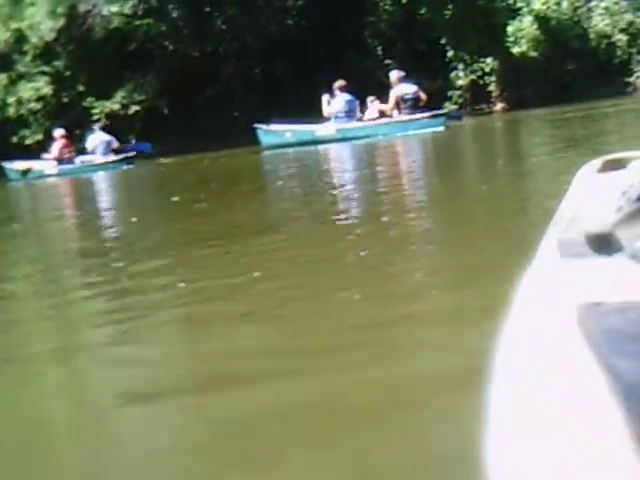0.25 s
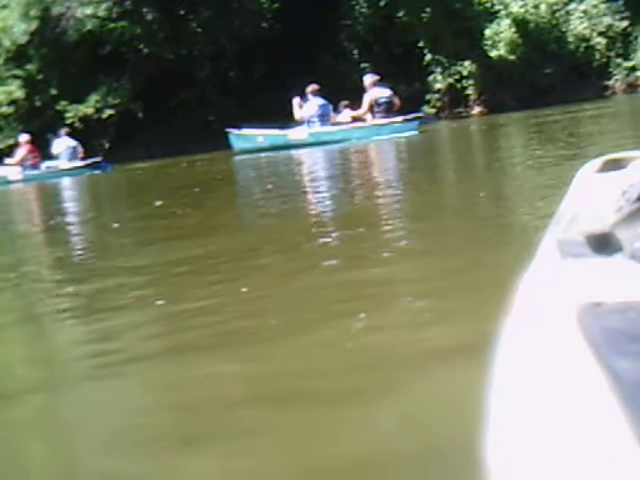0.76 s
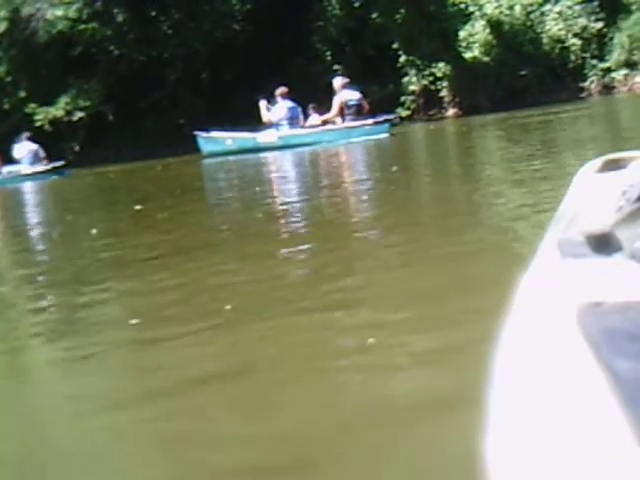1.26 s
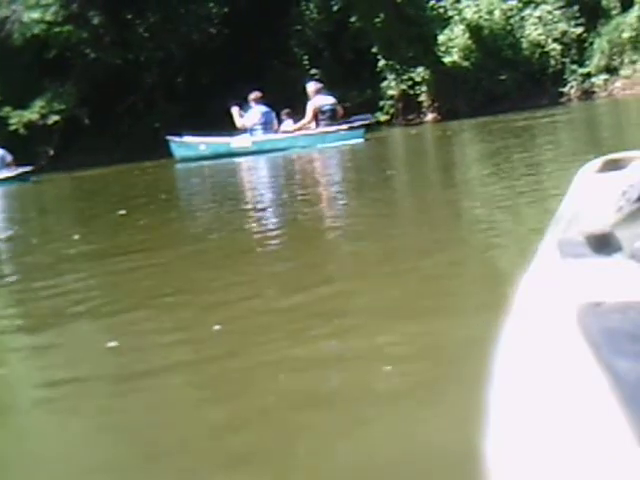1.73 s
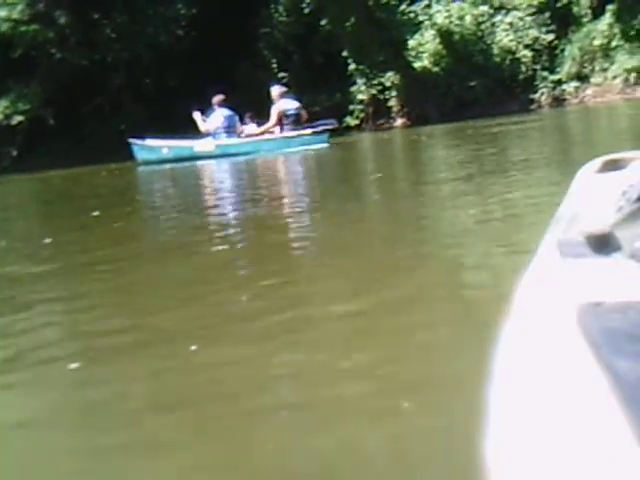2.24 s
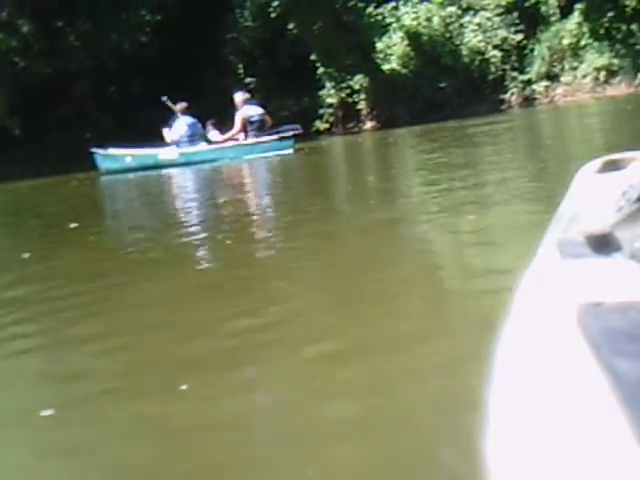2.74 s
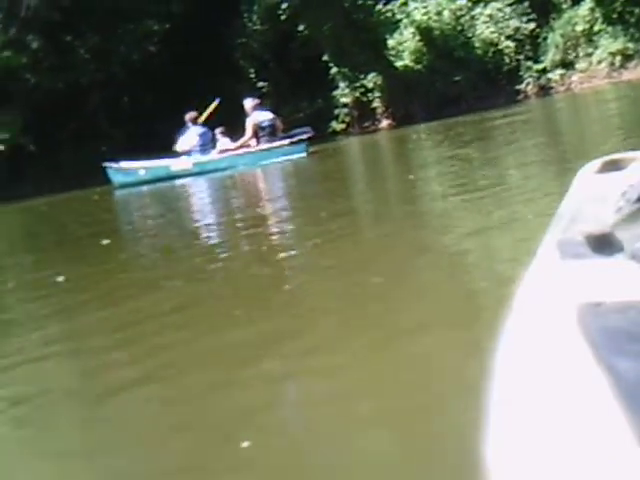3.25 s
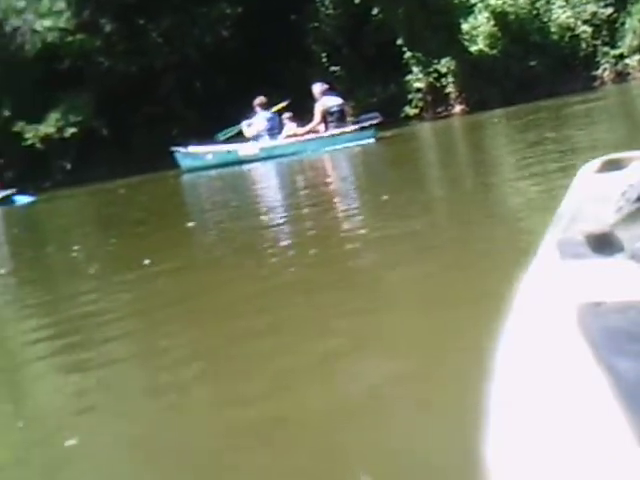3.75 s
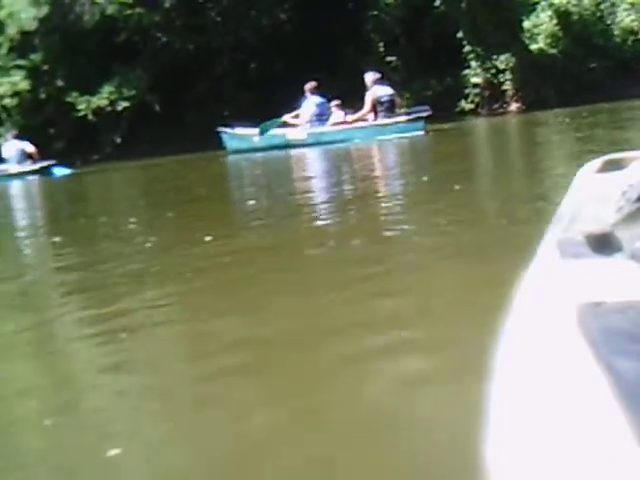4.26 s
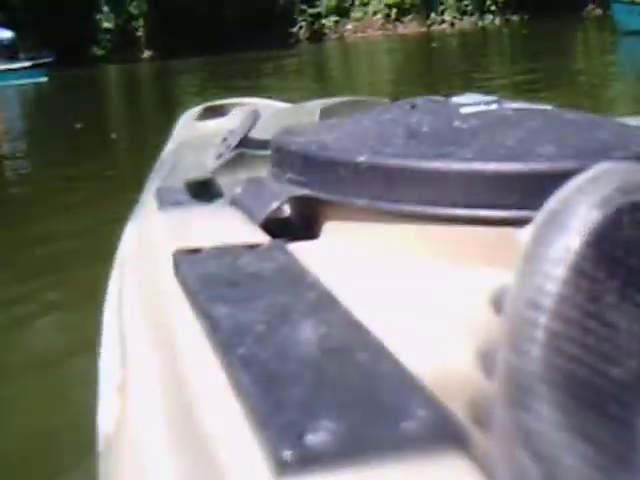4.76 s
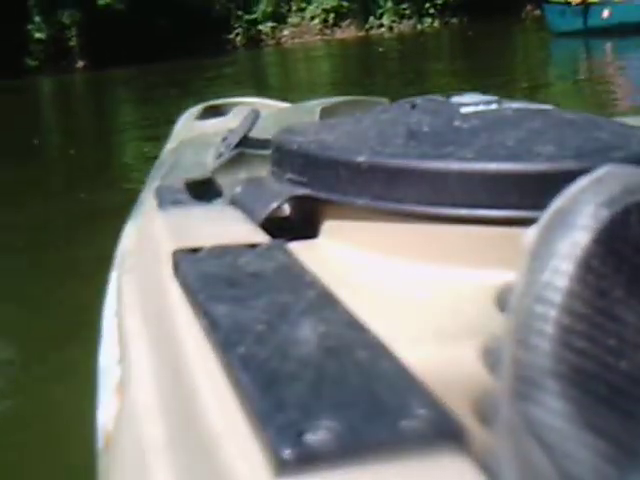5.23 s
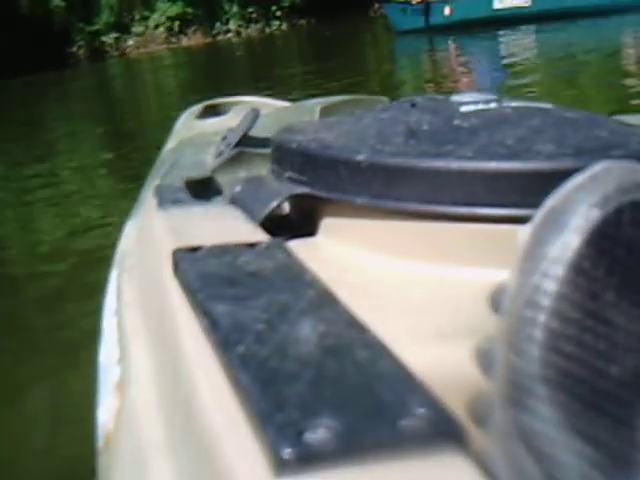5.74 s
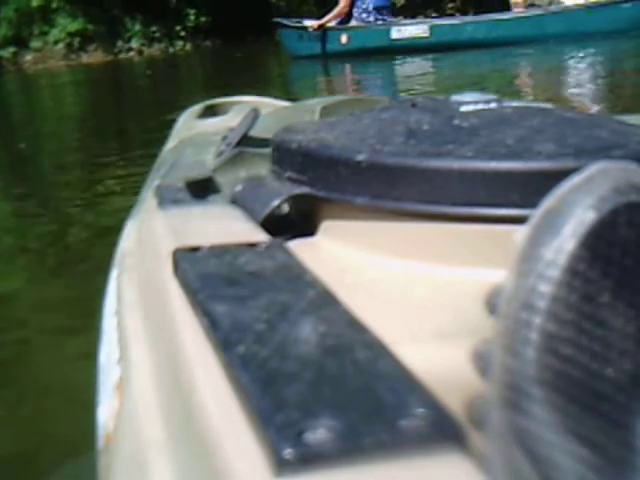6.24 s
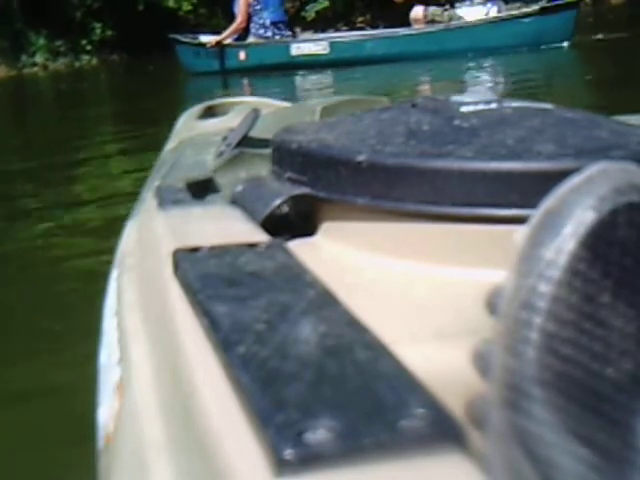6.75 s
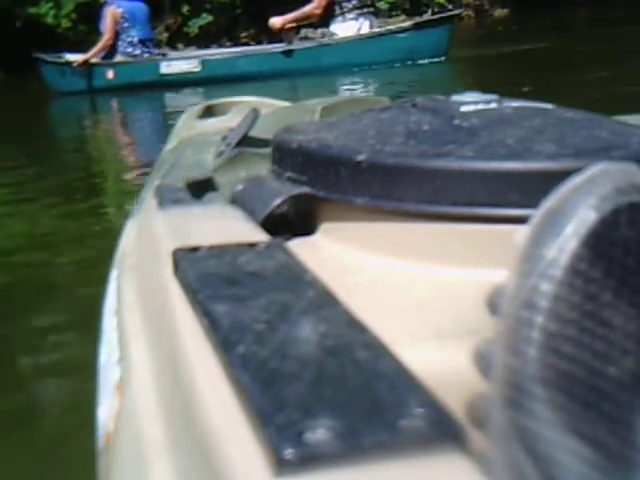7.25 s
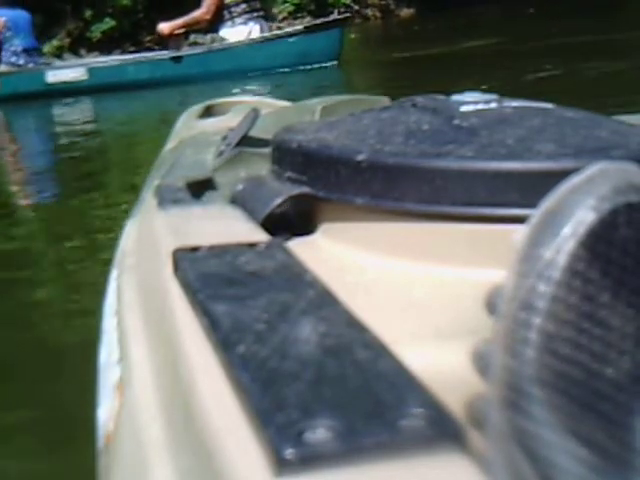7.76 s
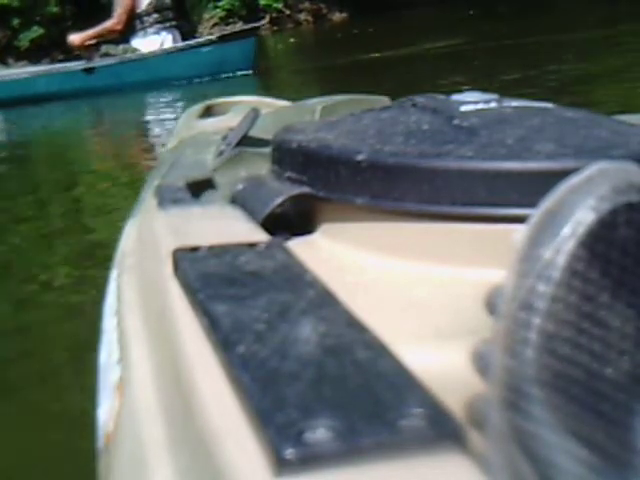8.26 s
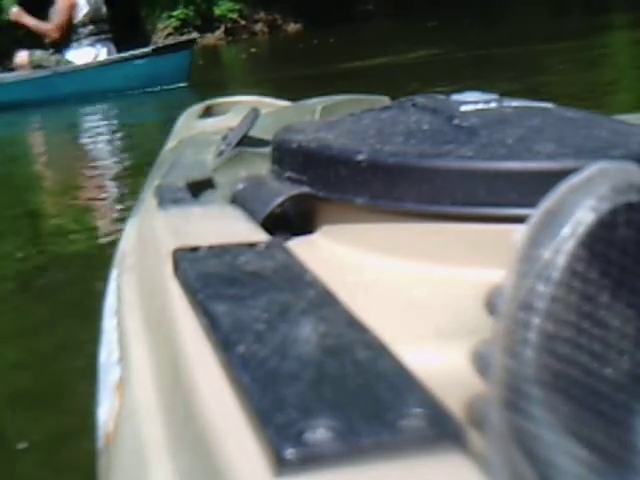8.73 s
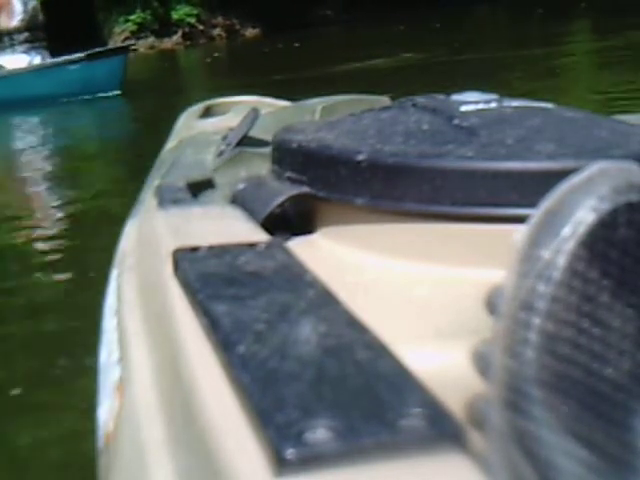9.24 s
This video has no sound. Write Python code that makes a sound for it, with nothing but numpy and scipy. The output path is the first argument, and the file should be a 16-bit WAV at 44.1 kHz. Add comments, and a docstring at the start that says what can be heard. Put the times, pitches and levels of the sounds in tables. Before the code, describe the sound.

A few light taps on a plastic kayak, then one loud, sharp knock with a brief rattle, over a faint electrical buzz.

```python
"""A small camera on a plastic kayak, calm river. Its electronics buzz and hiss faintly throughout.
From 1.8 s: a few light taps ring the hull; one wavelet laps at it.
At 4.4 s: the camera is set down hard on the deck, overloads its microphone, bounces and rattles.
Then one more tap, and wavelets ring their trapped air, liveliest near 7.2 s in a passing canoe's wake."""
import sys
import numpy as np
from scipy import signal
from scipy.fft import rfft, irfft
from scipy.io import wavfile

SR = 44100
rng = np.random.default_rng(int(sys.argv[2]) if len(sys.argv) > 2 else 0)


def put_to_file(sound):
    """Save the sound as 16-bit audio at rate SR, in the file named by the first command-line argument."""
    columns = np.atleast_2d(sound).T  # one column per channel
    safe = np.clip(columns, -1, 1)
    whole_steps = np.round(safe * 32767)
    wavfile.write(sys.argv[1], SR, whole_steps.astype(np.int16))


N = 418950
TIME_S = np.arange(N) / SR
RING_TIME_S = TIME_S[:SR]

# camera landing and bouncing: t/s, level/dB, contact cutoff/Hz
DECK_IMPACTS = [(4.4007, 2, 3000), (4.4070, 0, 2200), (4.412, 19, 382), (4.4452, -21.5, 2200),
                (4.45, -8, 2840), (4.4839, -17, 500), (4.5225, -46, 1300), (4.5423, -43.5, 1300)]


def camera_knocks(contact_q=1.8):
    """A hard edge strikes the deck, the weight follows with a duller push, then the camera bounces."""
    # low rumble after the overloading knock (two lowest rows), then deck modes: f/Hz, level/dB, t60/s
    rumble_and_deck = [(17, -46.5, 1.2), (46.7, -52.5, .7), (85.7, -45, .8), (128.4, -14.5, 0.11),
                       (161.5, -24.5, 0.16), (204.8, -17.5, .06), (244.6, -17, .075), (347, -51.5, 0.35),
                       (359, -6, .063), (441, -10, .055), (481.7, -8, .065), (700, -17, 0.044),
                       (798, -10.5, .05), (875, -8, .05), (970, -5.5, .06), (1055, -2, .06),
                       (1113, -4, .04), (1280, -12, 0.041), (1627, -11, 0.05), (1950, -16, 0.044),
                       (2300, -18.5, 0.041), (2720, -13, 0.036)]
    out, response = np.zeros(N), ring(rumble_and_deck)
    for t_s, level_db, contact_hz in DECK_IMPACTS:
        crack = from_db(-12) * burst(low_hz=600, high_hz=3000, t60_s=.06)
        add(out, t_s, from_db(level_db) * springy_contact(response + crack, contact_hz, contact_q))
    return out


def springy_contact(x, cutoff_hz, q):
    """Mass on a springy surface: a resonant low-pass."""
    w = 2 * np.pi * cutoff_hz
    return signal.lfilter(*signal.bilinear([w * w], [1, w / q, w * w], SR), x + 1e-18)


def housing_rattle(start_s=4.4066, swing_s=.02265, jitter_s=.0004, hits=5, loss_db_per_s=285):
    """A loose plastic part hits its stop once a swing, ever weaker, chatters between hits, then settles."""
    # housing modes: f/Hz, level/dB, t60/s
    housing_modes = [(2730, -9.5, 0.013), (3270, -7, .018), (3857, -11.5, 0.039), (4140, -7.5, 0.026),
                     (4450, -6.5, 0.048), (4800, -9.5, 0.013), (5300, -10.5, 0.023)]
    chatter_per_swing, chatter_db, settle_db = 3, -13, -27
    out, housing = np.zeros(N), ring(housing_modes)
    hits_s = swing_s * np.arange(hits) + jitter_s * rng.uniform(-1, 1, hits)
    chatter_s = (hits_s[:-1, None] + swing_s * rng.random((hits - 1, chatter_per_swing))).ravel()
    clicks = [(start_s + age_s, -loss_db_per_s * age_s) for age_s in hits_s]
    clicks += [(start_s + age_s, chatter_db - loss_db_per_s * age_s) for age_s in chatter_s]
    clicks.append((DECK_IMPACTS[-1][0], settle_db))   # drops into place at the last bounce
    stop_damping = decay(t60_s=.07)
    for t_s, level_db in clicks:
        snap = from_db(-7) * burst(low_hz=2400, high_hz=5600, t60_s=.02)
        add(out, t_s, from_db(level_db) * (housing + snap) * stop_damping)
    return out


def hull_taps(travel_s=.00514, top_hz=1450):
    """Soft contacts excite the lower modes; bending waves carry the high ones along the hull fastest."""
    # light taps: t/s, level/dB, contact cutoff/Hz
    taps = [(1.785, -44.5, 400), (2.942, -44, 450), (2.972, -46, 350), (2.9940, -39.5, 1800),
            (3.0737, -46.5, 1400), (3.1826, -43, 1400), (3.408, -42.5, 1300), (4.784, -42.5, 280)]
    # hull modes: f/Hz, level/dB, t60/s
    hull_modes = [(161.8, -9, 0.38), (338.4, 0, 0.12), (422, -4, 0.12), (622, -5.5, 0.12), (805, -26, .06),
                  (907, 1.5, 0.085), (1002, 4.5, 0.056), (1140, -22, .05), (1290, 3.5, 0.022),
                  (1436, -6, 0.038)]
    out = np.zeros(N)
    for t_s, level_db, contact_hz in taps:
        hull = from_db(-11) * burst(low_hz=750, high_hz=1300, t60_s=.08)
        for f_hz, mode_db, t60_s in hull_modes:
            lag_s = travel_s * (np.sqrt(top_hz / f_hz) - 1)
            add(hull, lag_s, ring([(f_hz, mode_db, t60_s)]))
        add(out, t_s, from_db(level_db) * butterworth(hull, contact_hz, "low"))
    return out


def water_laps(attack_s=.002, ref_hz=1000, ref_t60_s=.06, band_ratio=1.35):
    """Each wavelet traps air that rings inside a splash; smaller pockets die sooner and splash more."""
    # wavelets against the boat: t/s, level/dB, f/Hz
    wavelets = [(1.912, -48, 1040), (5.660, -46, 1060), (5.6611, -35, 385), (6.672, -47, 1140),
                (6.9654, -44.5, 998), (7.138, -50, 1150), (7.155, -47, 970), (7.416, -52, 1283),
                (7.489, -45.5, 3590), (7.650, -52, 1195)]
    out = np.zeros(N)
    attack = 1 - np.exp(-RING_TIME_S / attack_s)
    for t_s, level_db, f_hz in wavelets:
        t60_s = ref_t60_s * (ref_hz / f_hz) ** .42
        air_pocket = ring([(f_hz, 0, t60_s)])
        splash_db = -5.5 + 1.5 * np.log2(f_hz / ref_hz)
        splash = from_db(splash_db) * burst(f_hz / band_ratio, f_hz * band_ratio, t60_s)
        add(out, t_s, from_db(level_db) * (air_pocket + splash) * attack)
    return out


def ripples(count=70, base_db=-63.5, spread_db=2, wake_s=7.2, wake_width_s=.4, wake_db=8):
    """Tiny ripples tick against the boat at random, louder in the canoe's wake."""
    out = np.zeros(N)
    for slot, (timing, size, pitch) in enumerate(rng.uniform(-1, 1, (count, 3))):
        t_s = (slot + (1 + timing) / 2) / count * N / SR
        top_hz = 1080 * 2 ** (.25 * pitch)
        wake = np.exp(-((t_s - wake_s) / wake_width_s) ** 2)
        level_db = base_db + wake_db * wake + spread_db * size
        add(out, t_s, from_db(level_db) * burst(top_hz / 1.24, top_hz, t60_s=.091))
    return out


def electronics_buzz(gain_db=-41.5, start_s=.0037, step_gap_s=.0009, band_hz=(25, 3000)):
    """A load in the camera switches on and off in two quick steps; the edges leak into the microphone."""
    edges = switching_spikes(start_s) + from_db(-14) * switching_spikes(start_s + step_gap_s)
    return from_db(gain_db) * butterworth(edges, band_hz, "band", order=1)


def switching_spikes(start_s, rate_hz=49.38, duty=.533, decay_s=.00089):
    """A decaying spike at each switch-on, an opposite one at each switch-off."""
    cycles = (TIME_S - start_s) * rate_hz
    since_on_s = cycles % 1 / rate_hz
    since_off_s = (cycles - duty) % 1 / rate_hz
    return np.exp(-since_on_s / decay_s) - np.exp(-since_off_s / decay_s)


def amplifier_hiss():
    """Steady microphone amplifier noise, rising towards the bass."""
    # noise spectrum: f/Hz, power density/(dB re 1/Hz)
    spectrum = [(20, -86), (80, -89), (250, -92), (500, -95), (1000, -96.5), (2000, -98.5), (4000, -99),
                (5500, -101)]
    f_hz, density_db = np.transpose(spectrum)
    bins_hz = np.maximum(np.arange(N // 2 + 1) * SR / N, 1)
    gain = from_db(np.interp(np.log(bins_hz), np.log(f_hz), density_db)) * np.sqrt(SR / 2)
    return irfft(rfft(rng.standard_normal(N)) * gain, N)


def ring(partials):
    """Impulse response as a sum of decaying sines."""
    return sum(from_db(level_db) * decay(t60_s) * np.sin(2 * np.pi * f_hz * RING_TIME_S)
               for f_hz, level_db, t60_s in partials)


def burst(low_hz, high_hz, t60_s):
    """Dense weak modes as a band of decaying noise."""
    band_hz = [low_hz, max(high_hz, low_hz + 100)]
    noise = butterworth(rng.standard_normal(len(RING_TIME_S)), band_hz, "band")
    return noise / noise.std() * decay(t60_s)


def decay(t60_s):
    """Exponential envelope, 60 dB down at t60_s."""
    return np.exp(-np.log(1000) * RING_TIME_S / t60_s)


def butterworth(x, cutoff_hz, kind, order=2):
    """Causal Butterworth filter."""
    sections = signal.butter(order, cutoff_hz, kind, fs=SR, output="sos")
    return signal.sosfilt(sections, x + 1e-18)


def from_db(level_db):
    """Decibels to gain."""
    return 10 ** (np.asarray(level_db) / 20)


def add(track, t_s, sound):
    """Mix a sound into a track at t_s."""
    start = round(t_s * SR)
    track[start:start + len(sound)] += sound[:len(track) - start]


def scene():
    """All sources at one microphone; open water, no echo."""
    boat = camera_knocks() + housing_rattle() + hull_taps()
    water = water_laps() + ripples()
    return (boat + water + electronics_buzz() + amplifier_hiss())[None]


def record(dry, input_limit=.73, voice_band_hz=5323, output_limit=.71):
    """The input overloads; a voice band is kept; its overshoots clip again and are low-passed."""
    overloaded = np.clip(dry, -input_limit, input_limit)
    narrow = butterworth(overloaded, voice_band_hz, "low", order=22)
    clipped = np.clip(narrow, -output_limit, output_limit)
    return butterworth(clipped, cutoff_hz=16000, kind="low", order=24)


dry = scene()
out = record(dry)
put_to_file(out)
```